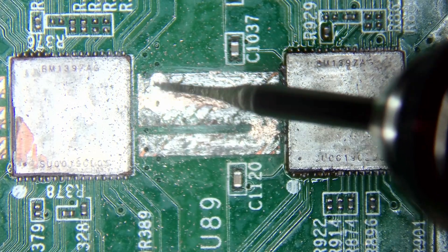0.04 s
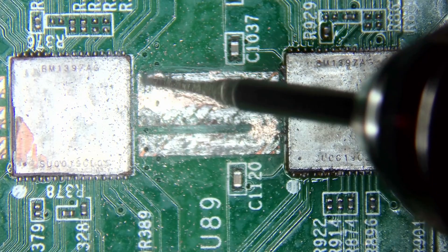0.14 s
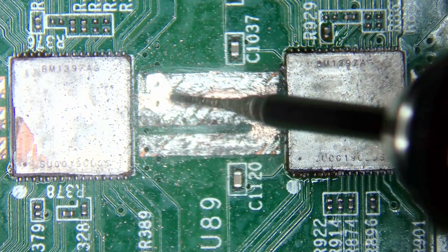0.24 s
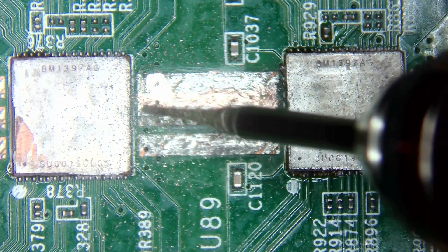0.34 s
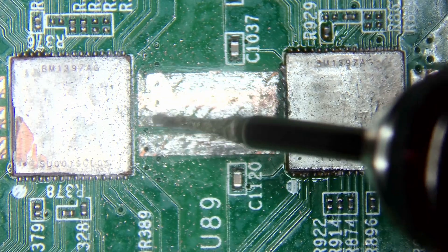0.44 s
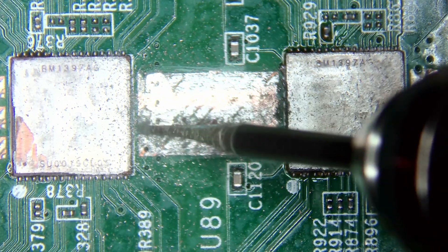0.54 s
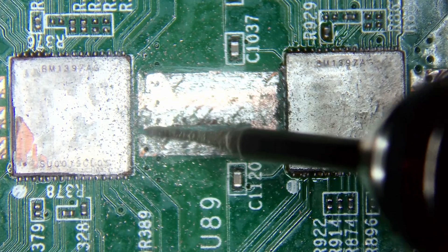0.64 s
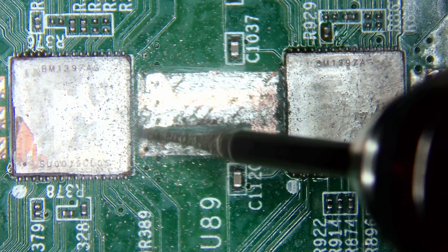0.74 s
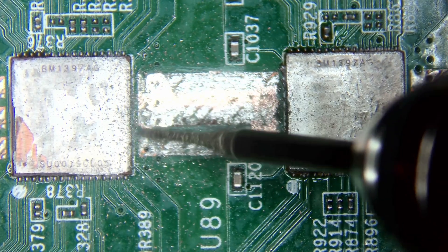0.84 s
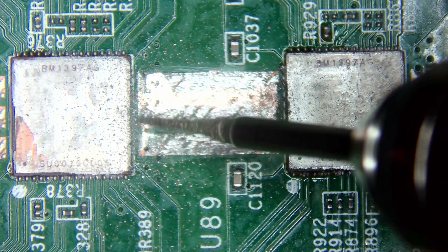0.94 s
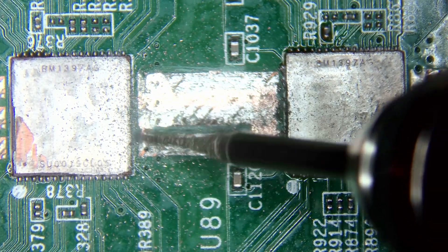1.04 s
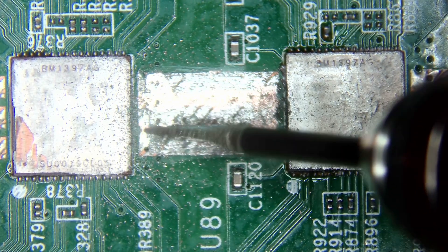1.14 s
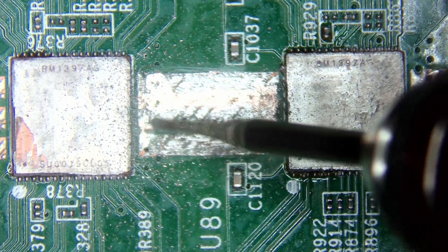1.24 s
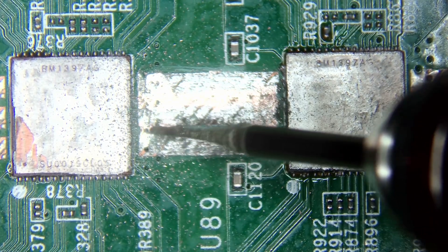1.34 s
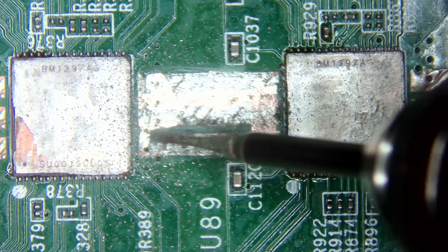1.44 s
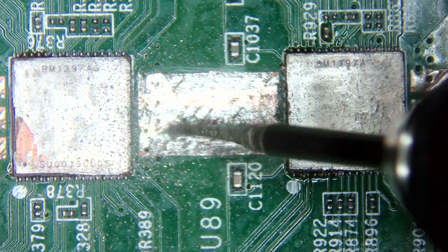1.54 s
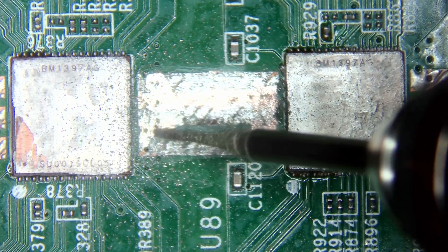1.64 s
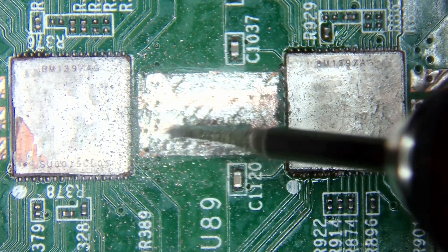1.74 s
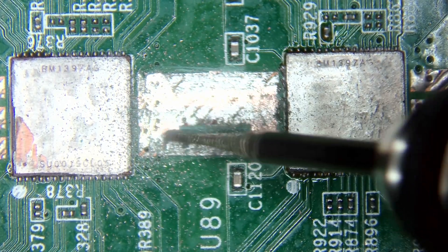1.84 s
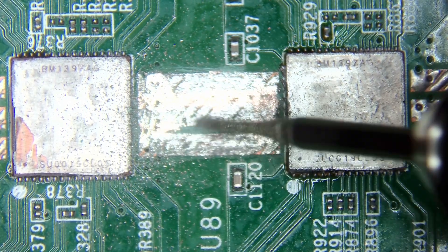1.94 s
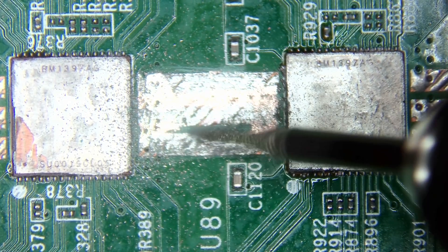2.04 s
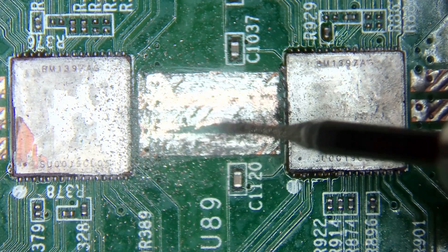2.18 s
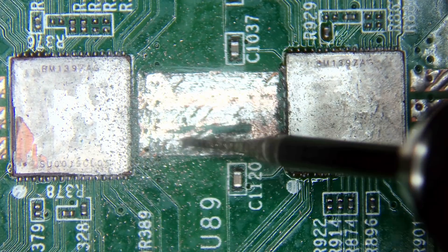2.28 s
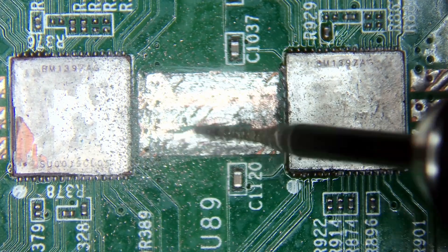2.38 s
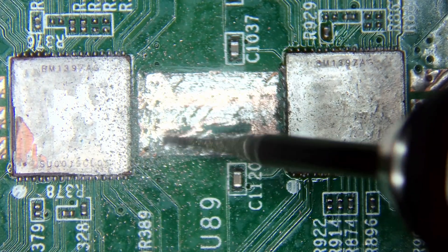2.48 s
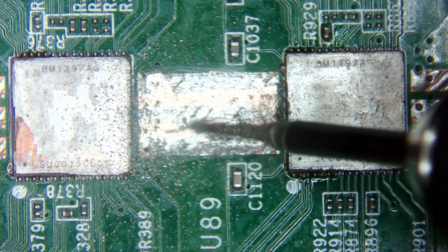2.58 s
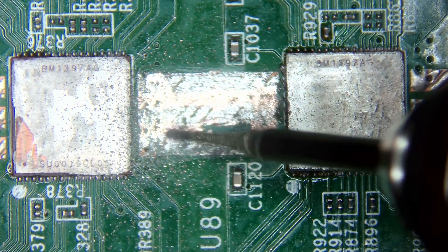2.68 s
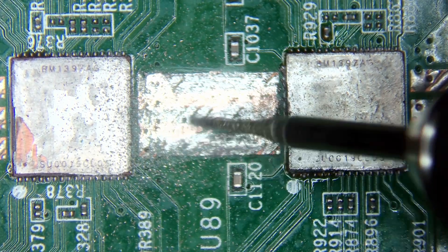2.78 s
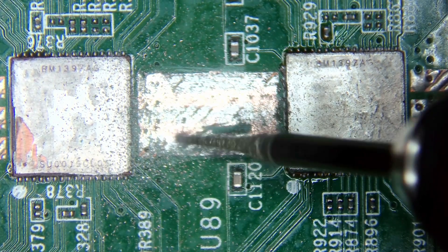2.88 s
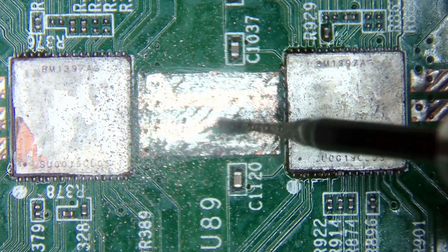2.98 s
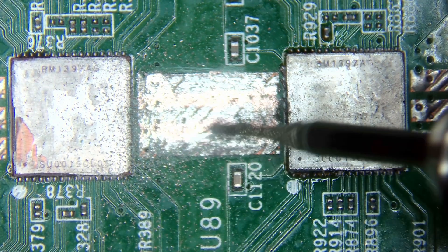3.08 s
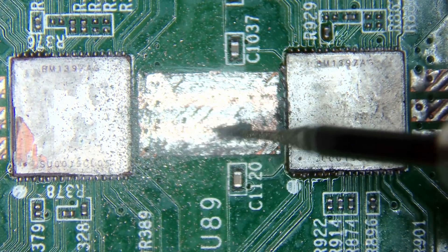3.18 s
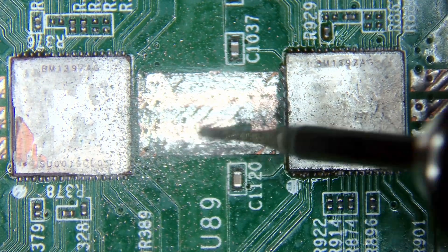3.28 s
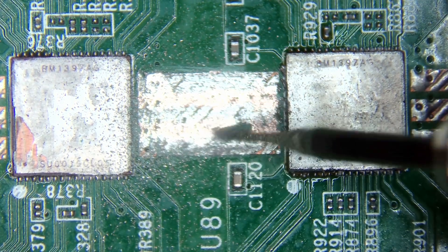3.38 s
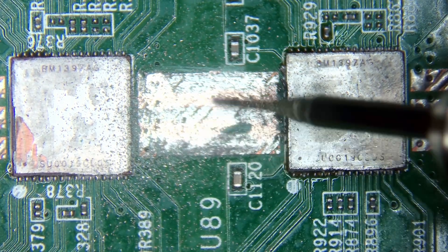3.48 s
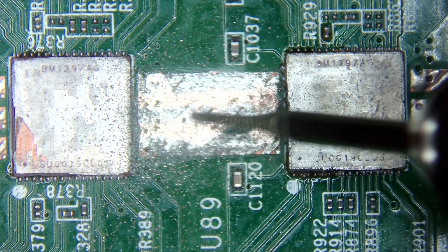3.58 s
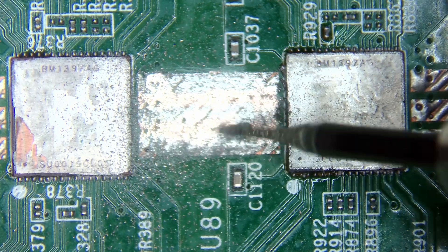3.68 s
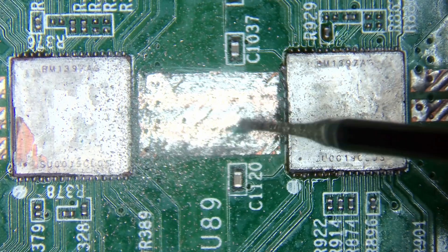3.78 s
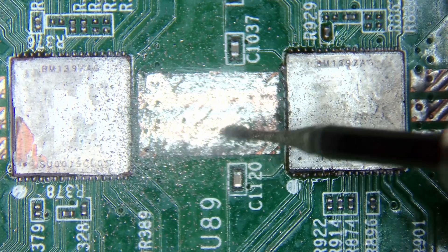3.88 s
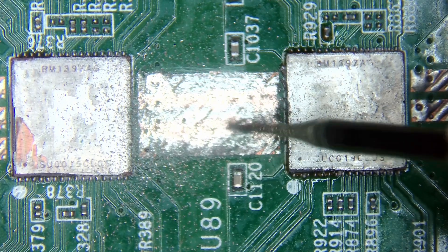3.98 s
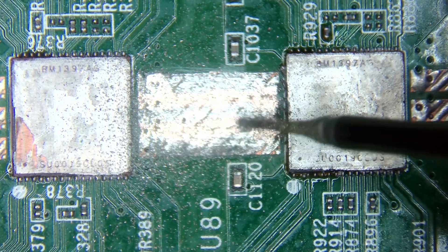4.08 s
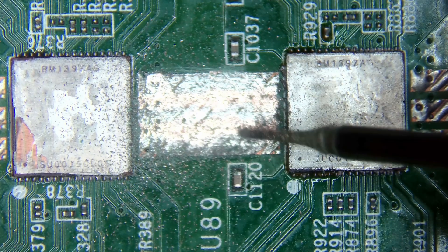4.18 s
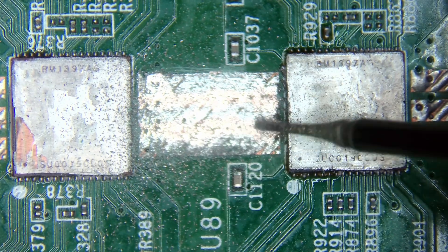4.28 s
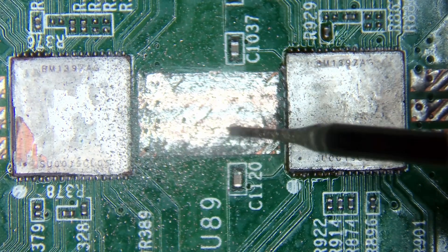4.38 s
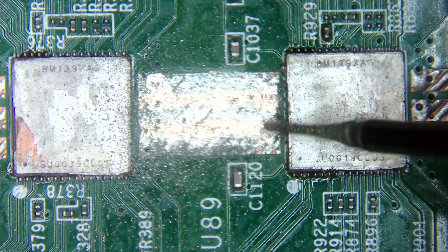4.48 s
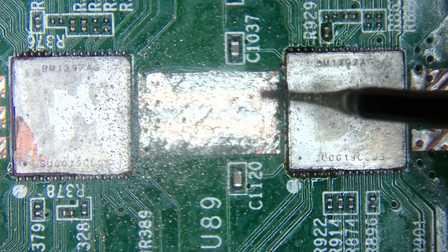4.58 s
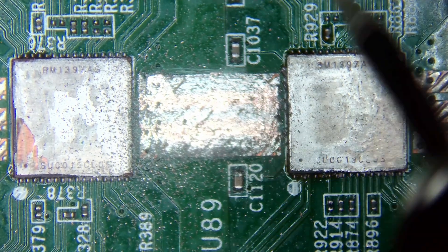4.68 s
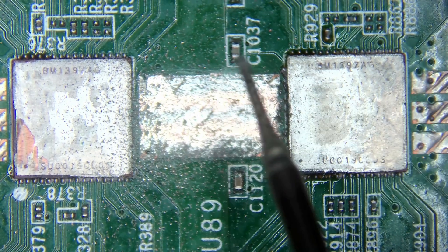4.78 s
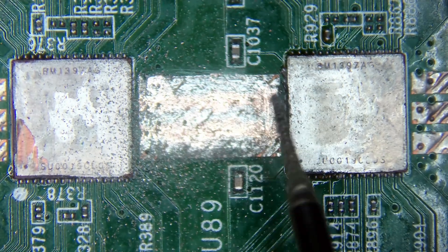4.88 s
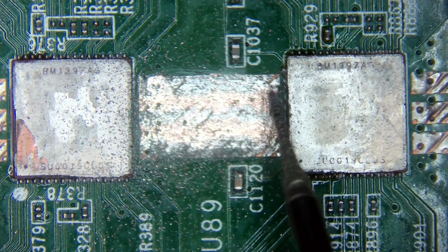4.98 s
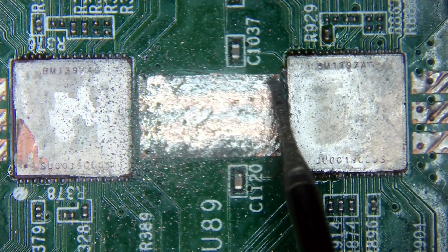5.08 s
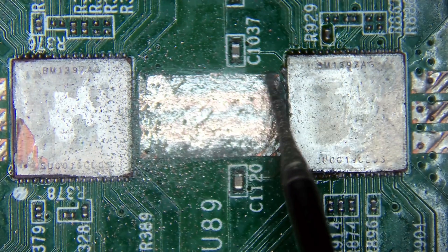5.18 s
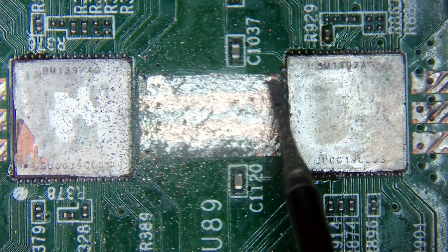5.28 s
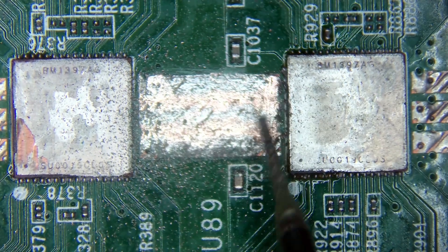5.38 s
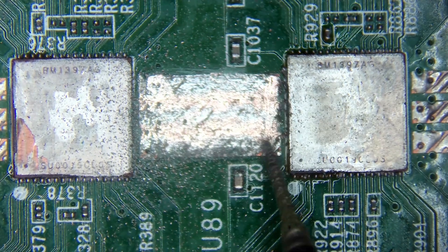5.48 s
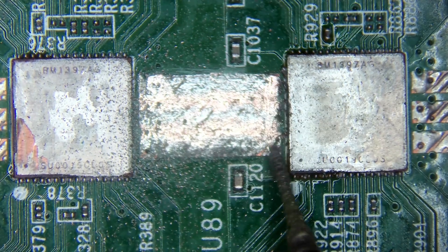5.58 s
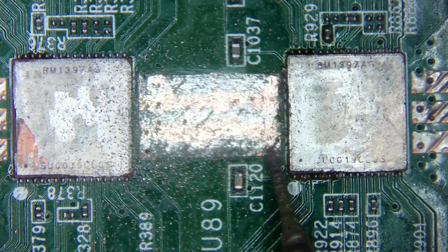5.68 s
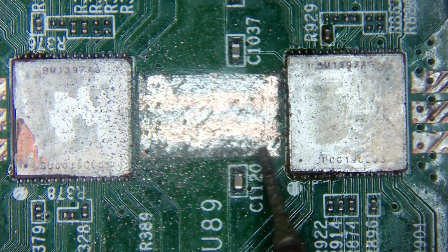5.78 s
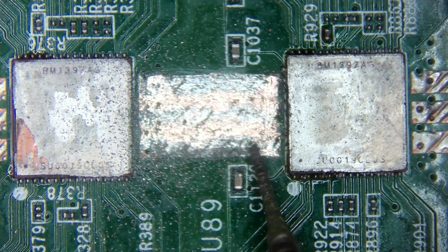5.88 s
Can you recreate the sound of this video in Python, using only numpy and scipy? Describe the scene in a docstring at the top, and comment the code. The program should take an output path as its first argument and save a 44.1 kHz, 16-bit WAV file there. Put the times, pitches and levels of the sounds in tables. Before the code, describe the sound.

A handheld grinder's high, chattering buzz and gritty hiss on a circuit board, with a brief free-spinning whine near the end.

```python
"""A pen grinder cleans a circuit board on a workbench. Its spinning tip, the burr, knocks on the board
once a turn, fast enough to make a buzz, and tears off hissing grit. The pen bounces in the hand, chatters,
slows when pressed, lifts off and whines freely, then works along the edge of a solder pad.
The bench adds short echoes, and the room rumbles quietly underneath."""
import sys
import numpy as np
from scipy import signal
from scipy.fft import rfft, irfft
from scipy.io import wavfile
from scipy.ndimage import uniform_filter1d

SR = 44100
rng = np.random.default_rng(int(sys.argv[2]) if len(sys.argv) > 2 else 0)


def generate_wav(signal):
    """Clip the signal to [-1, 1] and save it as 16-bit WAV at the path in sys.argv[1]."""
    frames = np.transpose(np.atleast_2d(signal))
    scaled = np.clip(frames, -1, 1) * 32767
    pcm = np.round(scaled).astype(np.int16)
    wavfile.write(sys.argv[1], SR, pcm)


N = 261513
TIME = np.arange(N) / SR
FREQ = np.maximum(np.fft.rfftfreq(N, 1 / SR), 1)
FLAT = TIME < 4.85  # true while the burr lies flat, false once it is turned to the pad's edge


def amp(db):
    """Turn decibels into a number to multiply by."""
    return 10 ** (np.asarray(db) / 20)


def unit(x):
    """Scale a signal so that its typical swing is 1."""
    return x / np.std(x)


def curve(rows):
    """Join the points of a (time, value) table with straight lines."""
    times, values = np.transpose(rows)
    return np.interp(TIME, times, values)


def smooth(x, seconds):
    """Round off quick changes by averaging twice."""
    size = max(int(seconds * SR), 1)
    return uniform_filter1d(uniform_filter1d(x, size), size)


def wander(seconds):
    """A random drift of typical size 1; more seconds make it slower."""
    return unit(smooth(rng.standard_normal(N), seconds))


def lag(x, seconds):
    """Follow x a moment late."""
    keep = np.exp(-1 / (seconds * SR))
    return x[0] + signal.lfilter([1 - keep], [1, -keep], x - x[0])


def spells(rows, ease_s):
    """Hold each (start, end, value) with soft edges; zero in between."""
    return smooth(sum(value * ((TIME > start) & (TIME < end)) for start, end, value in rows), ease_s)


def hump(at_s, half_s):
    """A flat-topped swell of height 1."""
    near = slice(*np.searchsorted(TIME, [at_s - 4 * half_s, at_s + 4 * half_s]))
    out = np.zeros(N)
    out[near] = np.exp(-.5 * np.abs((TIME[near] - at_s) / half_s) ** 3)
    return out


def colour(x, points):
    """Shape the tone with a (frequency, level) outline that falls away beyond its ends."""
    hz, db = np.transpose(points)
    octaves_outside = np.log2(FREQ / np.clip(FREQ, hz.min(), hz.max()))
    gain = amp(np.interp(np.log(FREQ), np.log(hz), db) - 20 * np.abs(octaves_outside))
    return irfft(rfft(x) * gain, N)


def ring(x, modes, low_hz=330):
    """Make a small object ring at its modes, the pitches it favours; it gives off little bass."""
    power = sum(amp(2 * db) / (1 + (hz / width * (FREQ / hz - hz / FREQ)) ** 2) ** 2
                for hz, width, db in modes)
    # 1j puts the sound a quarter cycle ahead of the motion
    return irfft(rfft(x) * 1j * np.sqrt(power / (1 + (low_hz / FREQ) ** 4)), N)


def room(level_db=-56.5):
    """The low, steady rumble of the room."""
    # tone of the rumble: f/Hz, relative level/dB
    rumble_tone = [(12, -39), (20, 0.5), (98, 0.5), (194, -0.5), (303, -6.5), (363, -7), (401, -5),
                   (467, -8.5), (560, -7), (730, -34), (1230, -120)]
    return amp(level_db) * unit(colour(rng.standard_normal(N), rumble_tone))


def bench(x, echo_db=-17, fade_s=0.062):
    """Add a blur of short echoes from the bench and the gear on it."""
    tail = rng.standard_normal(N) * amp(-60 * TIME / fade_s) * (TIME > .001)
    return x + amp(echo_db) * signal.fftconvolve(x, tail / np.linalg.norm(tail))[:N]


def shaft(load, touch, free_hz=219.65, sag_hz=28, inertia_s=0.03525, waver_hz=1.7):
    """Count the shaft's turns: rubbing makes it slow and unsteady, and each bite briefly brakes it."""
    # average turns per second with the burr lying flat: t/s, f/Hz
    flat_speed = [(0, 206.4), (.2, 208.7), (.36, 204.2), (.8, 209.3), (2, 205.9), (2.4, 203.1),
                  (2.75, 205.4), (3.02, 201.5), (3.14, 195.8), (3.2, 199.5), (3.32, 192.1), (3.43, 202.7),
                  (3.53, 190.7), (3.73, 204.2), (3.8, 194.9), (4, 194.4), (4.25, 205.3), (4.6, 207)]
    # the same along the edge of the pad: t/s, f/Hz
    edge_speed = [(5.07, 208.1), (5.36, 206.5), (5.55, 215.1), (5.65, 215.2), (5.74, 209.4), (5.93, 205.4)]
    slowing = free_hz - curve([*flat_speed, *edge_speed]) + waver_hz * wander(.012)
    felt_load = lag(load, inertia_s)
    sag = sag_hz * touch * (felt_load - smooth(felt_load, .075))
    return np.cumsum(free_hz - lag(touch, 0.0209) * slowing - sag) / SR


def harmonics(turns, rows, waver_db=2.0):
    """Pure tones at multiples of the shaft speed, each wavering in level on its own."""
    return sum(amp(db + waver_db * wander(0.029)) * np.sin(2 * np.pi * (multiple * turns + rng.random()))
               for multiple, db in rows)


def motor(turns, load, tone_boost_db=3.0, hiss_db=-54.5, ripple=0.33):
    """The motor whines, its brushes hiss in time with the turns, and its bearing sings briefly."""
    # the motor's whine: multiple of the shaft speed, relative level/dB
    whine_tones = [(6, -68), (7, -66), (8, -74), (10, -79), (12, -80), (14, -82.5), (16, -80), (17, -79),
                   (18, -70), (20, -72), (21, -88), (24, -71), (25, -72), (27, -87), (28, -71), (38, -82),
                   (42, -78), (50, -87)]
    # the case sings when the shaft is pushed sideways: multiple of the shaft speed, relative level/dB
    strain_tones = [(8, -78), (9, -60.5), (10, -57), (11, -56.5), (12, -59.5), (13, -72)]
    # hiss of the brushes and bearing: f/Hz, relative level/dB
    hiss_tone = [(350, -73), (600, -4), (1250, -4), (1560, -2), (1690, -5.5), (2540, -8), (4430, -10.5),
                 (5360, -2.5), (6950, -13), (9630, -16), (10000, -17), (10900, -20.5), (15500, -31)]
    # the bearing sings as the pen is turned: t/s, level/dB
    bearing_swell = [(4.55, -87), (4.62, -66), (4.75, -53.5), (4.78, -66), (4.82, -87)]
    # pitches at which the bearing rings: f/Hz, width/Hz, relative level/dB
    bearing_modes = [(2790, 780, -11), (4400, 450, -2.5), (5760, 293, -5.5), (6750, 1500, -16)]
    whine = harmonics(turns, whine_tones) + load * harmonics(turns, strain_tones)
    pulsing = 1 + ripple * np.cos(2 * np.pi * turns)
    hiss = unit(colour(rng.standard_normal(N) * pulsing, hiss_tone))
    bearing = amp(curve(bearing_swell)) * unit(ring(rng.standard_normal(N), bearing_modes))
    return amp(tone_boost_db) * whine + amp(hiss_db) * hiss + bearing


def grit(turns, strength, focus=1.3, drag=0.39, lead_turns=0.075, patchy_db=1.08, burst_hz=3000):
    """The burr's grains tear through copper in a bright burst at each blow and drag lightly between."""
    # tone of the grit with the burr lying flat: f/Hz, relative level/dB
    flat_tone = [(500, -25.5), (900, 0), (1500, 0), (2200, -1.5), (3200, -7.5), (4350, -1), (4950, -6.5),
                 (5600, 1.5), (6300, -4.5), (6700, -2), (8200, -12.5), (9700, -14.5), (11500, -25.5),
                 (15700, -38.5)]
    # the same at the edge of the pad: f/Hz, relative level/dB
    edge_tone = [(500, -15), (900, 1.5), (1800, 5), (2850, -5), (3600, 2.5), (4300, -3), (5150, 1.5),
                 (5900, -2), (6500, -1.5), (7500, -7), (9500, -14.5), (11500, -24), (15700, -35)]
    grain_db, scatter_db = 1.5, 1.6
    grains = unit(rng.standard_normal(N) * amp(grain_db * rng.exponential(size=N)))
    turn_gain = amp(scatter_db * rng.standard_normal(N))[(turns + .5).astype(int)]
    burst = grains * turn_gain * np.exp(focus * (np.cos(2 * np.pi * (turns + lead_turns)) - 1))
    bright_burst = signal.sosfilt(signal.butter(2, burst_hz, "high", fs=SR, output="sos"), burst)
    rasp = bright_burst + drag * rng.standard_normal(N)
    rasp *= amp(patchy_db * wander(.011))  # patches of solder, copper and lacquer pass under the burr
    return sum(colour(rasp * strength * here, tone) / np.std(colour(rasp, tone))
               for here, tone in [(FLAT, flat_tone), (~FLAT, edge_tone)])


def bounce(scatter_db=.5, length_scatter=0.13):
    """Extra force in dB as the pen bounces in the hand and bites about 14 times a second."""
    # runs of bites: first t/s, last t/s, number of bites, first level/dB, last level/dB, half a bite/s
    runs = [(0.02, 0.236, 4, 6.5, 3.5, 0.018), (0.309, 0.413, 3, 7, 7.5, 0.012),
            (0.494, 0.629, 3, 11, 12, .014), (0.714, 1.15, 7, 9, 9, 0.015), (1.227, 1.421, 4, 12, 9, 0.018),
            (1.496, 1.662, 4, 10, 5.5, .018), (1.74, 1.899, 3, 9, 5.5, 0.018),
            (2.023, 2.176, 3, 7, 5, .017), (2.435, 2.842, 7, 6.5, 5, .014), (4.077, 4.391, 6, 3, 5, 0.016),
            (4.487, 4.559, 2, 9, 11, .017), (5.104, 5.23, 3, 8.5, 3, 0.018),
            (5.282, 5.354, 2, 9, 5.5, 0.015), (5.712, 5.914, 3, 11.5, 10, .017)]
    bites = [(at_s, db, half_s) for first, last, count, first_db, last_db, half_s in runs
             for at_s, db in np.linspace((first, first_db), (last, last_db), count)]
    chance = rng.standard_normal((len(bites), 2))
    return sum((db + scatter_db * deeper) * hump(at_s, half_s * np.exp(length_scatter * longer))
               for (at_s, db, half_s), (deeper, longer) in zip(bites, chance))


def skips(half_s=0.0057, landing_s=0.012, rebound=0.12):
    """Change of force in dB: it drops as the burr jumps and overshoots a little as it lands."""
    # jumps of the burr: t/s, change in level/dB
    jumps = [(1.452, -10), (2.472, -7), (2.81, -7), (2.877, -6), (3.019, -14), (3.424, -8), (3.682, -13),
             (3.745, -13), (5.338, -8), (5.878, -3)]
    return sum(db * (hump(at_s, half_s) - rebound * hump(at_s + landing_s, half_s)) for at_s, db in jumps)


def knocks(turns, force, looseness, scatter_db=1.3, jitter_turns=.011, least_swing_db=1.35, slip=.08):
    """The burr's high side strikes the board once a turn; a light touch makes the blows uneven."""
    # pitches at which the board rings with the burr lying flat: f/Hz, width/Hz, relative level/dB
    flat_modes = [(394, 120, -27), (658, 70, -13.5), (798, 126, -9), (1072, 167, 4), (1188, 83, 5.5),
                  (1367, 203, 1), (1970, 230, -14.5), (2200, 270, -40), (4330, 500, -25), (5270, 680, -34)]
    # the same at the edge of the pad: f/Hz, width/Hz, relative level/dB
    edge_modes = [(664, 150, -12.5), (827, 170, -7), (1053.4, 170, 3), (1237, 285, -9), (1445.4, 211, 5.5),
                  (1685, 210, -5), (1900, 310, -9), (2306, 140, -25), (3560, 780, -33), (5200, 770, -8)]
    # chatter, where every second blow is weak: start t/s, end t/s, swing in level/dB
    chatter = [(.04, .2, 7), (.3, 1.15, 3), (2.55, 2.92, 7)]
    count = np.arange(1, int(turns[-1]))
    later, harder = rng.standard_normal((2, len(count))) * np.interp(count, turns, looseness)
    place = np.interp(count + jitter_turns * later, turns, np.arange(N))
    # strong and weak blows alternate, and now and then the pattern slips by a turn
    swing_db = np.interp(count, turns, np.maximum(spells(chatter, .04), least_swing_db))
    strong = (-1) ** (count + np.cumsum(rng.random(len(count)) < slip))
    swing_power = (amp(2 * swing_db) + amp(-2 * swing_db)) / 2
    size = amp(scatter_db * harder + strong * swing_db) / np.sqrt(swing_power)
    # each click is spread over a few samples so that it can land between two of them
    nearby = place.astype(int)[:, None] + np.arange(-7, 9)
    clicks = size[:, None] * np.sinc(nearby - place[:, None]) * np.hanning(nearby.shape[1])
    blows = np.zeros(N)
    np.add.at(blows, nearby.clip(0, N - 1), clicks)
    return sum(ring(blows * force * here, modes) / np.std(ring(blows, modes))
               for here, modes in [(FLAT, flat_modes), (~FLAT, edge_modes)])


def scene(firm_db=-38, grit_db=-41, tremor_db=1.34, touchdown_boost_db=2):
    """The hand presses the burr to the board, and one shaft drives the blows, the grit and the whine."""
    # when the burr touches the board: start t/s, end t/s, level/dB added to grit_db
    contacts = [(-.1, .259, -.2), (.284, 1.922, .2), (1.944, 4.603, -.2), (5.071, 5.381, -4.8),
                (5.534, 5.599, -2.5), (5.613, 6.1, -4.8)]
    # how hard the hand presses, as the strength of the blows between bites: t/s, level/dB
    pressure = [(0, -38), (.08, -43.5), (.22, -45.5), (.35, -42), (.55, -47.5), (1.15, -47), (1.5, -44.5),
                (2, -44), (2.35, -35), (2.45, -42.5), (2.7, -41.5), (2.95, -35.5), (3.6, -36), (4, -38),
                (4.35, -39.5), (4.6, -47), (5.07, -45.5), (5.35, -45), (5.64, -49.5), (5.93, -45)]
    touch = spells([(start, end, 1.) for start, end, _ in contacts], .004)
    grit_level = spells([(start, end, amp(grit_db + db)) for start, end, db in contacts], .004)
    bite_db = bounce() + tremor_db * wander(0.02)
    skip_db = skips()
    touchdown_db = touchdown_boost_db * sum(hump(start + .005, .008) for start, _, _ in contacts)
    force = amp(curve(pressure) + bite_db + skip_db + touchdown_db)
    load = force / amp(firm_db)  # 1 for a firm press
    turns = shaft(touch * load, touch)
    blows = knocks(turns, touch * force, looseness=np.clip(1 / load, .55, 1.4))
    # the grit follows only a share of each bite and skip
    bite_share, skip_share = np.where(FLAT, 0.094, .55), 0.18
    scrape = grit(turns, grit_level * amp(touchdown_db + bite_share * bite_db + skip_share * skip_db))
    rumble = room()
    whine = motor(turns, touch * np.sqrt(load))
    return (bench(blows + scrape + whine) + rumble)[None]


def record(dry, top_hz=15800):
    """Cut away the highest treble."""
    return signal.sosfilt(signal.ellip(10, .2, 70, top_hz, fs=SR, output="sos"), dry)


dry = scene()
out = record(dry)
generate_wav(out)
```